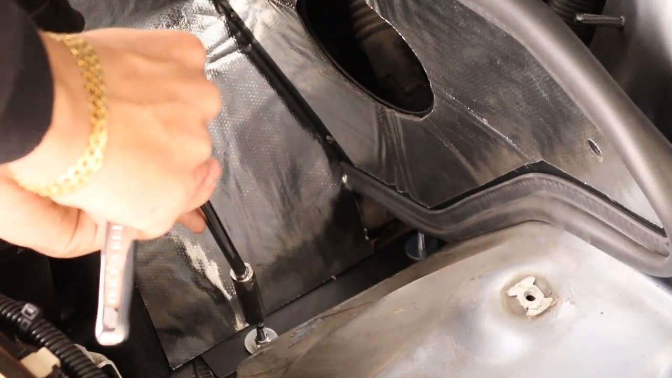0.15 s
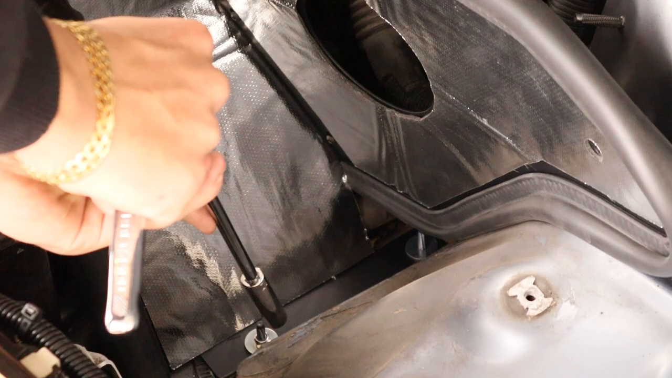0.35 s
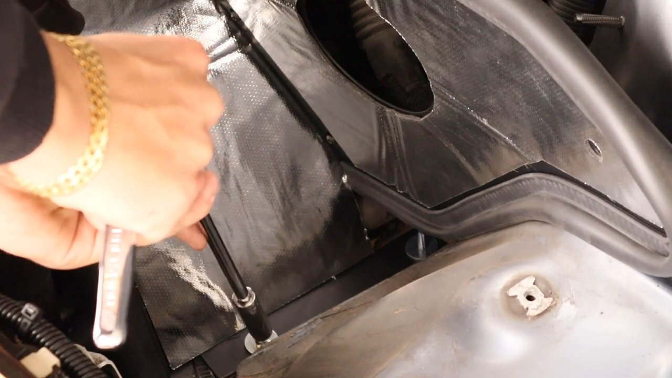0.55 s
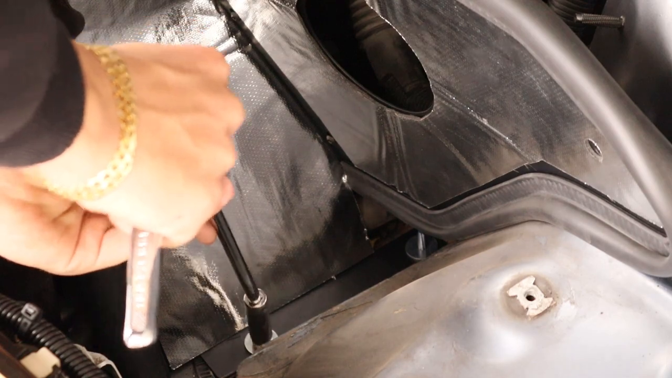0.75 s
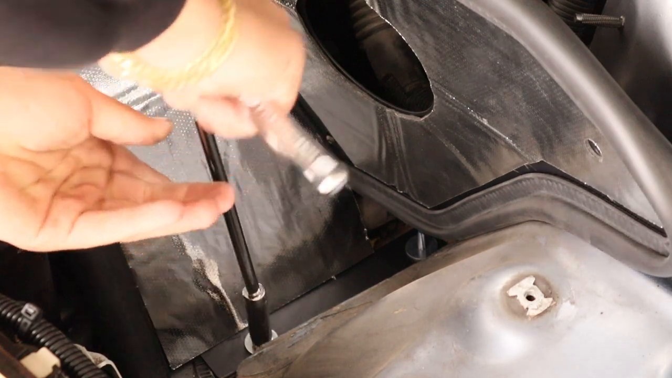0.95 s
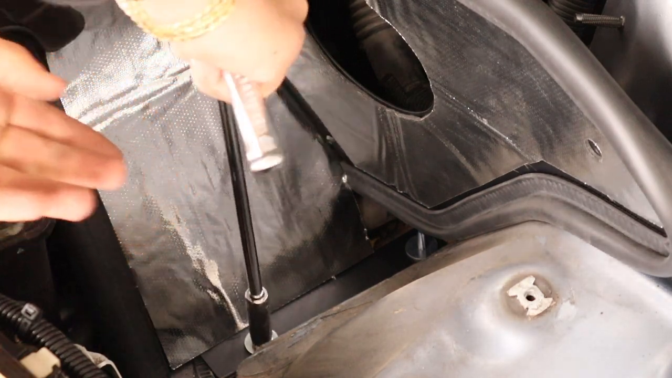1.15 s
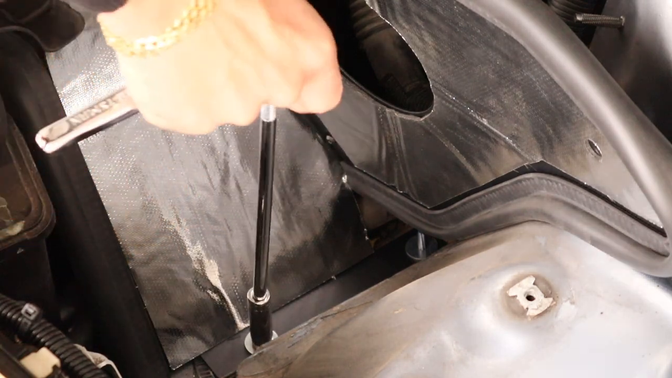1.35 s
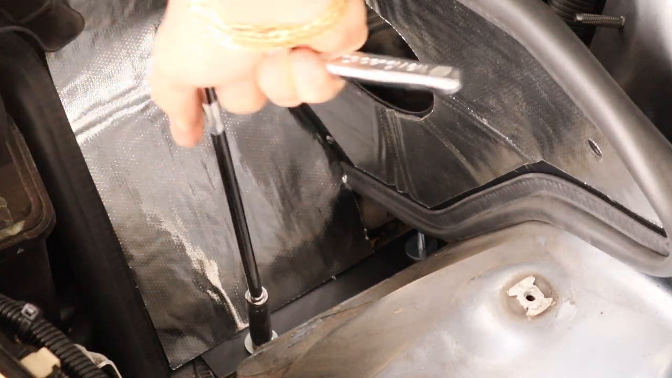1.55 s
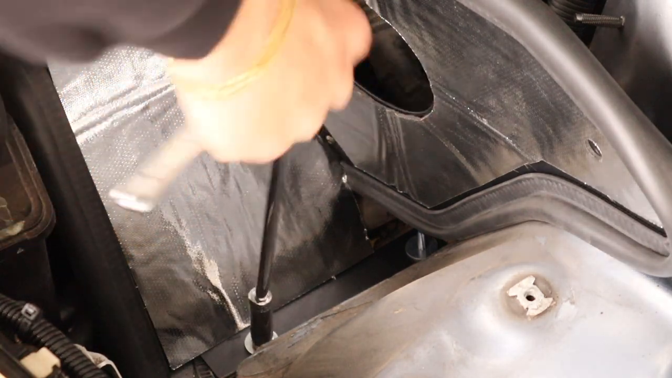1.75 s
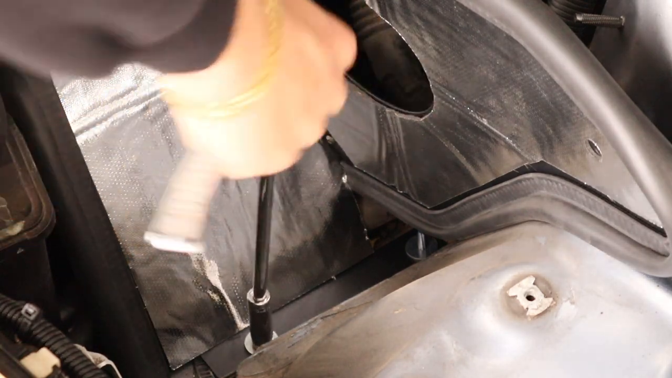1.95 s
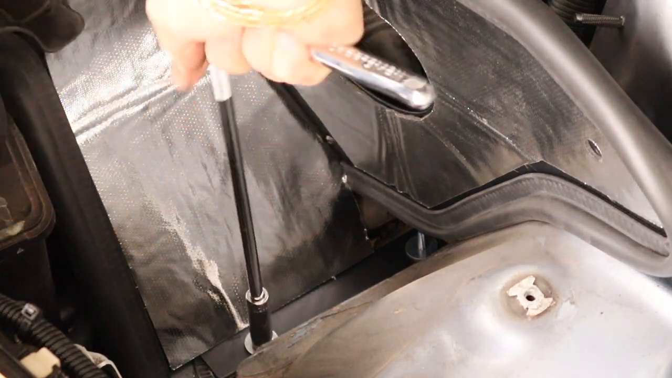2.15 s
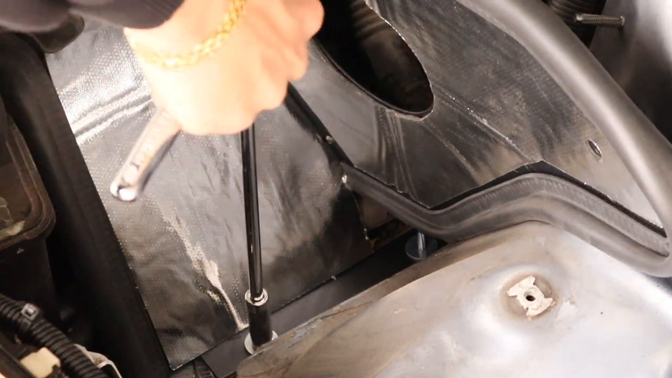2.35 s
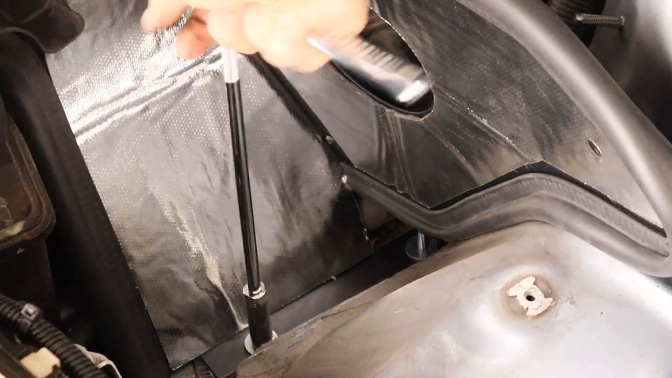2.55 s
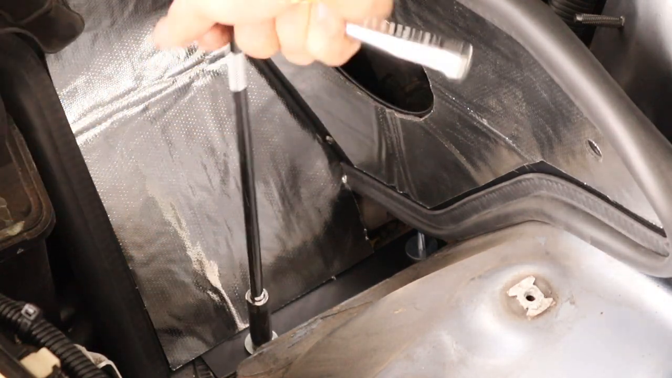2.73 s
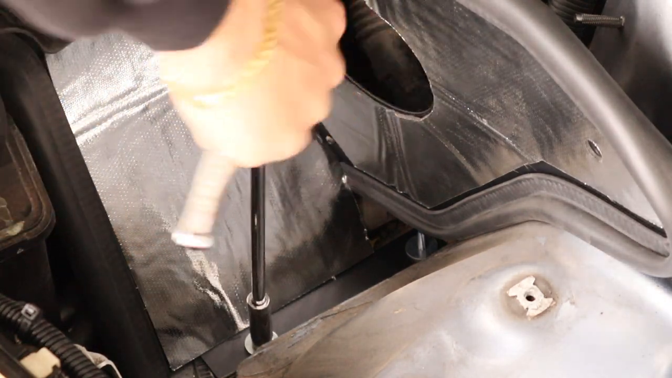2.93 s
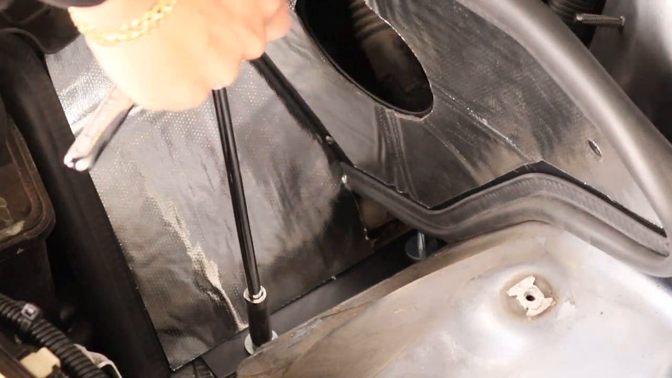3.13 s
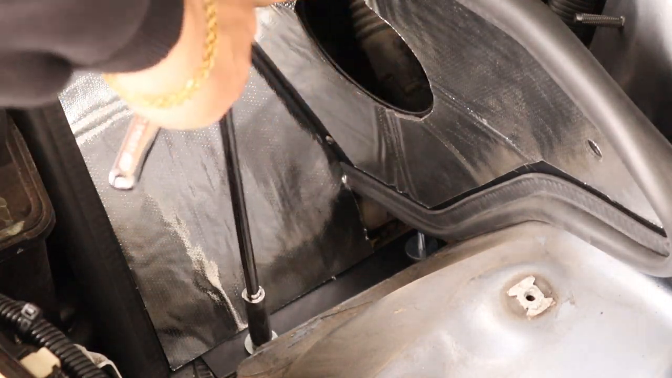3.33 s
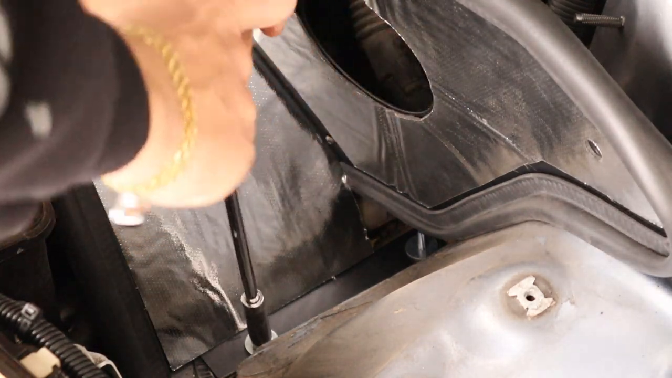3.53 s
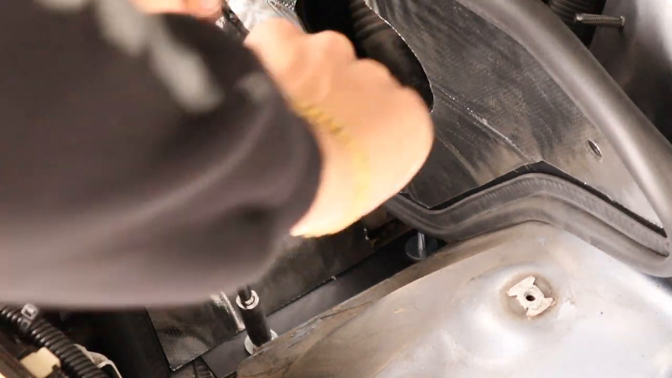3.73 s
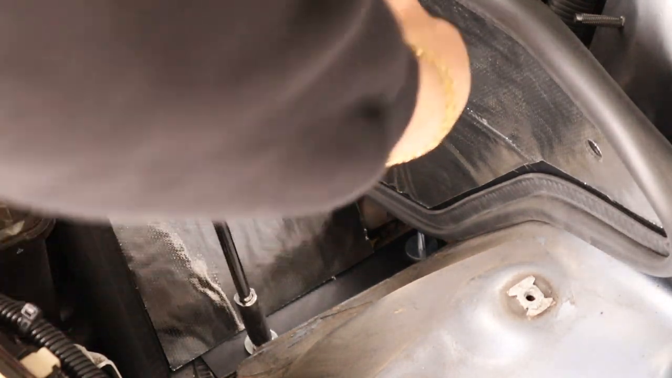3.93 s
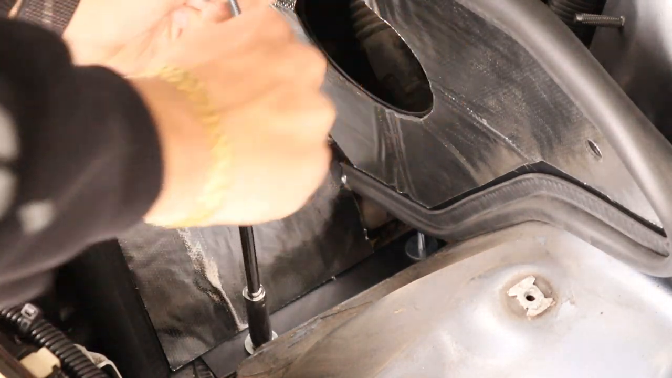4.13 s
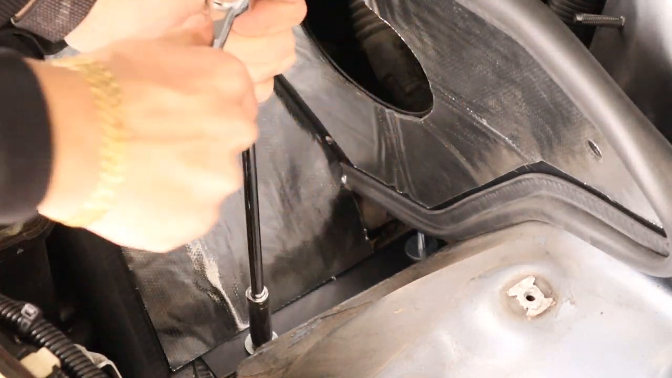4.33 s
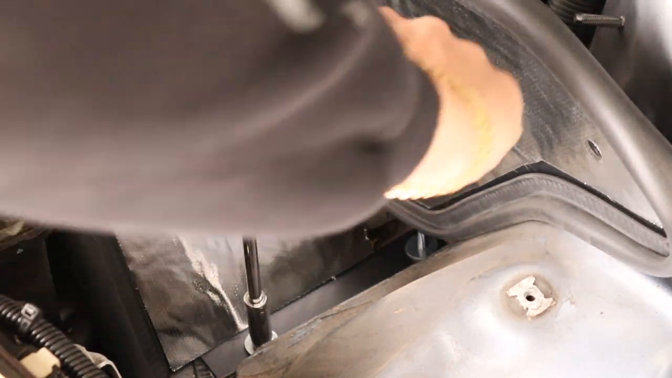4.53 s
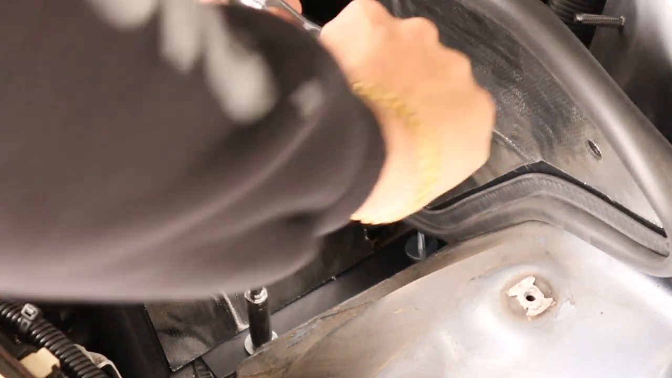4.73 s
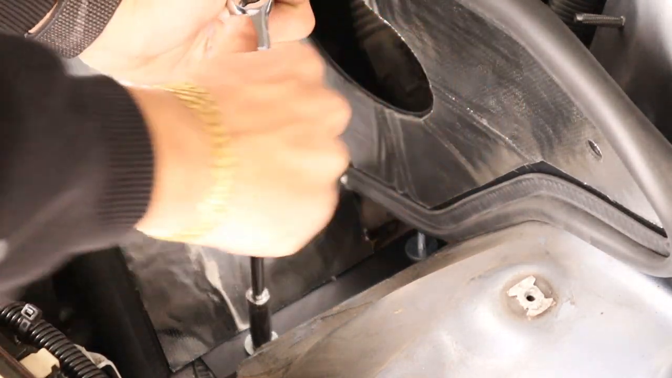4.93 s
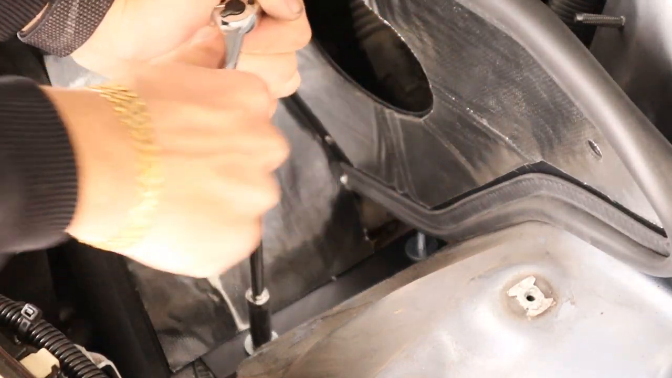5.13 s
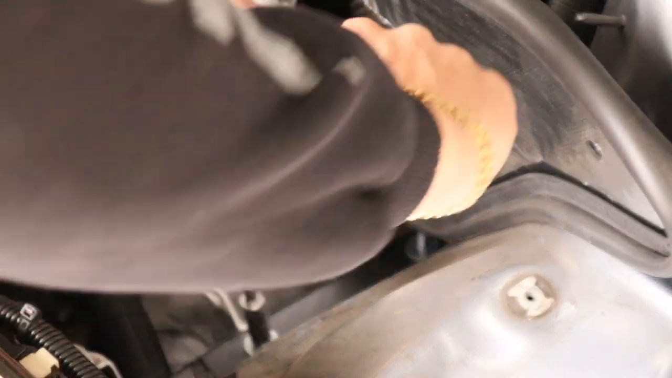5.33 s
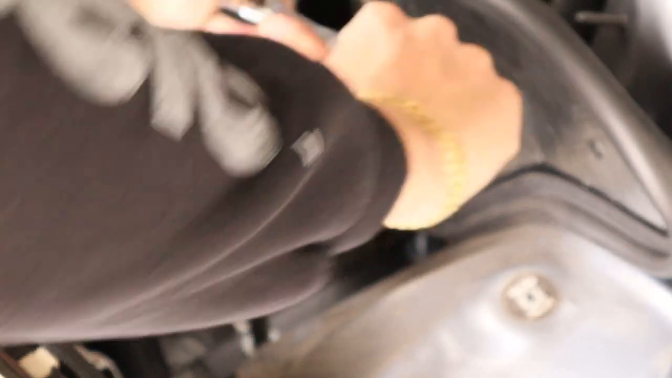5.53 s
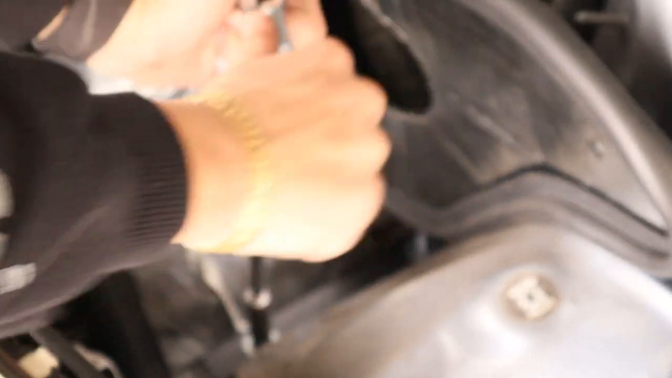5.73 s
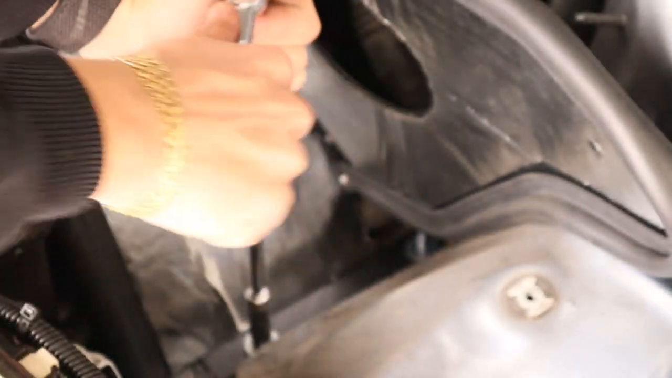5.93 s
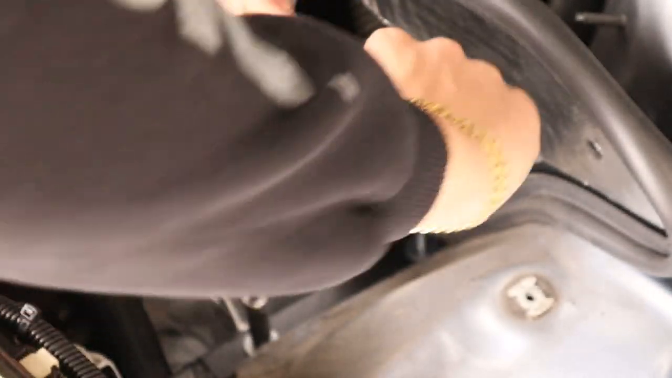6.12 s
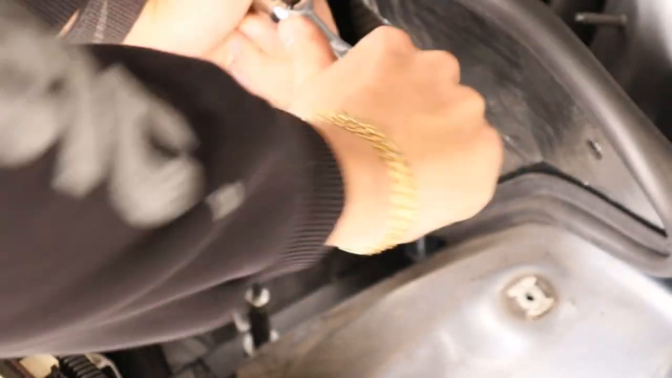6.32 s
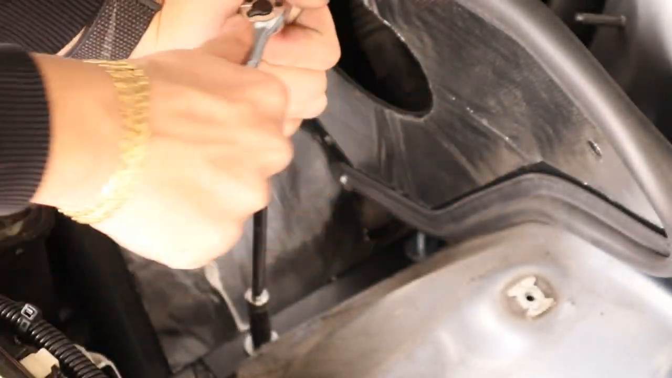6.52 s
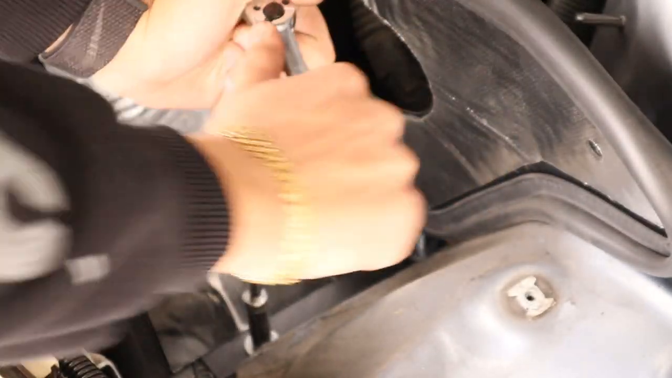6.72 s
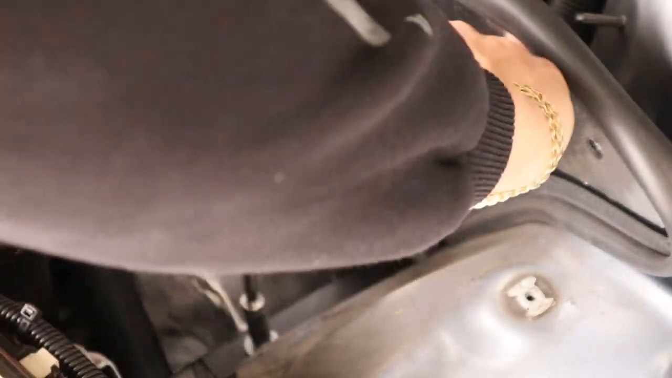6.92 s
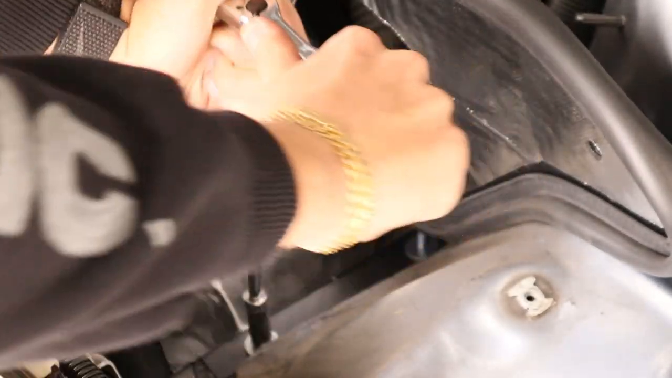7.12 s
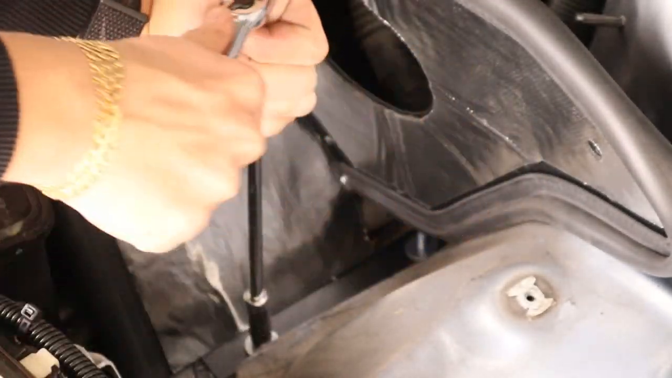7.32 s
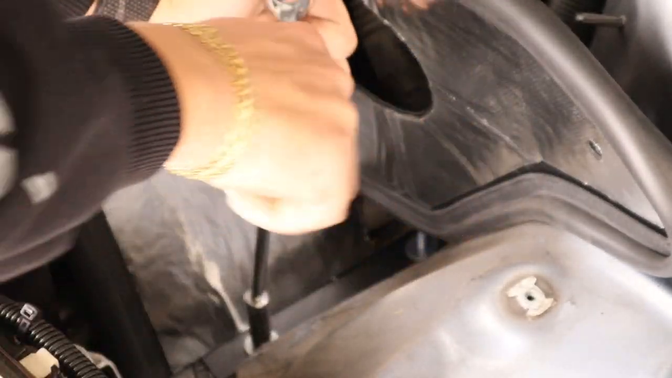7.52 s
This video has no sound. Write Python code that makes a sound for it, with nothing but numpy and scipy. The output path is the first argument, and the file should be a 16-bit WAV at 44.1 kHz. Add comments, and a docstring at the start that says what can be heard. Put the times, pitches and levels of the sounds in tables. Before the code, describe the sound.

A loose socket and long extension bar rattle and knock sharply against metal as they are seated on a nut. Then a hand ratchet works back and forth: fast bursts of bright, dry pawl clicks alternate with small clunks and dull low thumps from the car body. Close microphone in an engine bay, with short hard reflections, a light garage tail and a quiet hum underneath.

```python
"""A car engine bay inside a garage, where a hand ratchet on a long extension bar runs a nut down.
On each back swing the pawl clicks over the gear teeth; the loose socket and joints knock as the swing turns.
Each contact is a short burst of noise that rings the tool and body parts; the car body adds dull low thumps.
The nut rubs faintly on its thread, as noise through the same resonances. The bay and the garage ring on
as decaying noise echoes, over a quiet hum and a low rumble of filtered noise."""
import sys
import numpy as np
from scipy import signal
from scipy.fft import rfft
from scipy.io import wavfile

SR = 44100
rng = np.random.default_rng(int(sys.argv[2]) if len(sys.argv) > 2 else 0)


def inscribe(sig):
    """Save sig as 16-bit PCM at rate SR to the path in sys.argv[1].

    A 1-D sig is mono; a 2-D sig holds one channel per row.
    Samples are clipped to [-1, 1] before scaling.
    """
    pcm = np.round(np.clip(np.atleast_2d(sig).T, -1, 1) * 32767)
    wavfile.write(sys.argv[1], SR, pcm.astype(np.int16))


N = 338247


def from_db(db):
    """Gain of a level in dB."""
    return 10 ** (np.asarray(db, float) / 20)


def rms_one(x):
    """Scale to rms 1."""
    return x / np.sqrt(np.mean(x ** 2) + 1e-20)


def at_hz(points, hz):
    """Read a (frequency [Hz], value) table on a log-frequency axis."""
    table_hz, values = np.array(points).T
    return np.interp(np.log(hz), np.log(table_hz), values)


def bandpass(x, order, edges_hz):
    """Keep the sound between two edges."""
    return signal.sosfilt(signal.butter(order, edges_hz, "band", fs=SR, output="sos"), x)


def bands(size):
    """Half-octave bands of noise with their centres; neighbours come from separate noises."""
    edges = 20 * 2 ** np.arange(0, 10.1, .5)
    white = rng.standard_normal((2, size))
    for k, (low, high) in enumerate(zip(edges, edges[1:])):
        yield np.sqrt(low * high), bandpass(white[k % 2], 2, [low, high])


def resonance(x, hz, width_hz):
    """Two-pole resonance, gain 1 on top; a narrower one rings longer."""
    r = np.exp(-np.pi * np.clip(width_hz, 5, 5000) / SR)
    numerator = np.array([1, 0, -1]) * (1 - r * r) / 2
    denominator = [1, -2 * r * np.cos(2 * np.pi * hz / SR), r * r]
    return signal.lfilter(numerator, denominator, x + 1e-18)


# spectrum of the garage background: (frequency [Hz], relative band level [dB])
HUM = [(20, -47.5), (44, -11.5), (116, -14), (319, 2.5), (574, -3.5), (802, -1), (1060, -9), (1220, -8.5),
       (2020, -15), (2990, -17), (8410, -22), (13500, -27), (16000, -27)]
HUM_DB, HUM_FLICKER_DB = -68.5, 1.5   # overall rms; spread of each band's flicker
FLICKER_STEP = 2000   # samples


def hum():
    """Garage background and microphone hiss: noise bands, each flickering a little."""
    steps = np.arange(N // FLICKER_STEP + 2)
    out = 0
    for hz, band in bands(N):
        flicker = np.interp(np.arange(N) / FLICKER_STEP, steps, rng.standard_normal(len(steps)))
        out = out + band * from_db(at_hz(HUM, hz) + HUM_FLICKER_DB * flicker)
    return from_db(HUM_DB) * rms_one(out)


def echo(x, decay):
    """Convolve with noise that dies band by band; energy 1."""
    t = np.arange(SR // 2) / SR
    tail = 0
    for hz, band in bands(len(t)):
        t60_s = np.maximum(at_hz(decay, hz), .01)
        tail = tail + band * from_db(-60 * t / t60_s)
    tail *= np.minimum(t / 0.0019, 1)      # reflections need a moment to build up
    return signal.fftconvolve(x, tail / np.sqrt(np.sum(tail ** 2)))[:N]


# decay of the engine bay: (frequency [Hz], time to fall 60 dB [s])
BAY = [(200, 0.092), (1000, 0.1), (4000, 0.11), (8000, 0.046), (13000, 0.013)]
# decay of the garage: (frequency [Hz], time to fall 60 dB [s])
GARAGE = [(200, 0.82), (1000, 0.58), (4000, 0.58), (8000, 0.29), (13000, 0.32)]
BAY_DB, GARAGE_DB = -2.5, -7   # echo gains


def surroundings(spread):
    """The close bay and the wider garage each answer the sound that spreads from the tool."""
    return from_db(BAY_DB) * echo(spread, BAY) + from_db(GARAGE_DB) * echo(spread, GARAGE)


# low rumble that swells and fades: (time [s], deep band level [dB], middle band level [dB])
RUMBLE = [(0, -90.5, -73.5), (1.2, -83.5, -77), (2.3, -85, -75), (2.56, -95, -75), (2.69, -71, -66),
          (2.8, -81, -65.5), (3.1, -83, -78.5), (3.9, -82, -75.5), (4.4, -76, -78), (5.1, -79, -78),
          (5.5, -82, -73.5), (6.4, -78, -82), (7.67, -83, -78)]
# deep, middle and upper rumble bands: (low edge [Hz], high edge [Hz])
RUMBLE_HZ = [(30, 64), (85, 130), (140, 268)]
# the upper band: level at rest, gain against the thumps, how long it follows them
UPPER_REST_DB, UPPER_SHAKE_DB, SHAKE_S = -76.5, -5.5, 0.037


def rumble(thuds):
    """Three low noise bands: two under slow level curves, the upper one stirred by the thumps."""
    s, *levels_db = np.transpose(RUMBLE)
    gains = [from_db(np.interp(np.arange(N) / SR, s, db)) for db in levels_db]
    keep = np.exp(-1 / (SHAKE_S * SR))
    shake = np.sqrt(signal.lfilter([1 - keep], [1, -keep], thuds ** 2 + 1e-18))   # running rms
    gains.append(from_db(UPPER_REST_DB) + from_db(UPPER_SHAKE_DB) * shake)
    out = np.zeros(N)
    for edges_hz, gain in zip(RUMBLE_HZ, gains):
        out += gain * rms_one(bandpass(rng.standard_normal(N), 3, edges_hz))
    return out


# nut turning on its thread: (start [s], length [s], level at the middle [dB])
RUB = [(5.08, 0.14, -63.5), (6.317, 0.099, -58), (7.343, 0.25, -63.5), (5.75, 0.19, -76),
       (4.1, 0.58, -70.5)]
# share of the rub heard through tick, head, bar, bracket and panel: one relative level each [dB]
RUB_SHARES_DB = (-34, -35, 3, 11, 13.5)


def rub():
    """Friction noise of the nut, heard through the resonances of all the parts, twice as wide."""
    t, friction = np.arange(N) / SR, rng.standard_normal(N)
    colour = np.zeros(N)
    for share_db, part in zip(RUB_SHARES_DB, PARTS):
        for hz, width, db in part:
            colour += from_db(share_db + db) * resonance(friction, hz, 2 * width)
    level = np.zeros(N)
    for s, length, db in RUB:
        level += from_db(db) * np.sin(np.pi * np.clip((t - s) / length, 0, 1))
    return level * rms_one(colour)


# dull thumps as the strain goes into the car body: (time [s], level before shaping [dB], main tone [Hz])
THUMPS = [(0.196, -54, 370), (0.519, -58.5, 370), (0.77, -53, 241), (0.935, -45, 260), (1.07, -49, 230),
          (1.196, -43.5, 387), (1.484, -46, 430), (1.732, -41.5, 304), (1.847, -42.5, 376),
          (2.036, -60, 258), (2.127, -49, 367), (2.248, -45.5, 261), (2.589, -41, 340), (2.693, -43.5, 214),
          (2.795, -42, 355.5), (3.539, -55, 310), (3.643, -53, 281), (4.017, -38, 352), (4.447, -38.5, 244),
          (4.478, -42, 221.3), (4.785, -46, 393), (5.606, -46.5, 310), (6.038, -55, 216),
          (6.107, -41.5, 334), (6.351, -50, 246), (6.765, -41.5, 380), (7.102, -50.5, 368)]
THUMP_CYCLES, THUMP_RISE_MS = 3.16, 3.9   # cycles of the main tone to fall to 1/e; rise time


def thumps():
    """A soft push sets two low tones of the car body swinging for a few cycles."""
    out, t = np.zeros(N), np.arange(SR // 5) / SR
    for (s, db, hz), (detune, phase) in zip(THUMPS, rng.random((len(THUMPS), 2))):
        second_hz = hz * (0.602 + .9 * detune)
        swing = np.sin(2 * np.pi * hz * t) + 0.67 * np.sin(2 * np.pi * (second_hz * t + phase))
        rise = 1 - np.exp(-t * 1000 / THUMP_RISE_MS)
        fall = np.exp(-t * hz / THUMP_CYCLES)
        i = round(s * SR)
        out[i:i + len(t)] += (from_db(db) * swing * rise * fall)[:N - i]
    return out


# socket, bar and drive square knocking in their play:
# (time [s], head level [dB], bar level [dB], body level before sharing out [dB], rattle decay before limits [ms])
KNOCKS = [(0.1078, -78, -55.5, -55, 0.97), (0.1969, -42.5, -47, -29.5, 1.8), (0.2163, -56, -60, -71, 2.5),
          (0.2882, -59, -57.5, -72, 1.9), (0.4857, -75, -43.5, -38.5, 0.63), (0.4949, -53, -59, -76, 1.6),
          (0.5207, -48, -24.5, -35.5, 3.2), (0.562, -43.5, -40.5, -48.5, 3.4),
          (0.6107, -38.5, -32.5, -45, 3), (0.6351, -49, -38, -46.5, 2.5), (0.6518, -51, -47, -50, 1.1),
          (0.6784, -68, -48, -49, 1.1), (0.764, -65, -47, -50, 3), (0.773, -26, -21.5, -32.5, 1.64),
          (0.8028, -11, -25.5, -54, 0.56), (0.8102, -28, -16.5, -30.5, 3.4),
          (0.9248, -30.5, -22.5, -46.5, 0.57), (0.9366, -21, -23, -26, 4.1), (0.9537, -55, -40, -67, 1.4),
          (1.159, -68, -48, -46, 2.7), (1.1743, -53, -49, -47, 1.6), (1.1833, -38.5, -32, -33.5, 13.6),
          (1.477, -75, -77, -55, 2.8), (1.4927, -62, -43, -42.5, 1.4), (1.5002, -58, -48, -45, 2.5),
          (1.5106, -58, -41, -52, 2.5), (1.5163, -48, -32.5, -44.5, 2.3), (1.7073, -61, -41.5, -44, 2.2),
          (1.7266, -38.5, -34, -41.5, 3.5), (1.733, -45, -45, -34, 0.9), (1.8428, -59, -82, -42.5, 2.8),
          (1.912, -78, -85, -62, 3), (1.9802, -71, -49, -38.5, 1.4), (2.0141, -77, -43, -64, 1.6),
          (2.0269, -42, -39, -36, 3.8), (2.213, -66, -47, -42.5, 5), (2.2365, -36, -38.5, -38, 4.2),
          (2.496, -72, -65, -61, 2.2), (2.5631, -65, -46, -45, 1.5), (2.5724, -46, -37, -36.5, 2.4),
          (2.5804, -47, -37.5, -34, 3.3), (2.7873, -62, -36, -25, 1.8), (2.7934, -59, -36, -33, 3.8),
          (2.8269, -29.5, -31, -32.5, 3.5), (2.8412, -44, -41, -41, 2.2), (3.1408, -58, -54.5, -50, 2.1),
          (3.253, -71, -68.5, -58, 2.1), (3.296, -66, -57, -46, 0.88), (3.428, -57, -58, -57.5, 2),
          (3.4757, -44, -44, -52, 0.9), (3.488, -57, -55, -46.5, 3.5), (3.533, -60, -39, -42, 1.8),
          (3.5662, -59, -37, -52, 1.3), (3.5755, -42.5, -43.5, -49, 2.3), (3.636, -67, -50, -42.5, 4.2),
          (3.6485, -60, -41, -43, 3), (4.0117, -54, -39, -44.5, 1.4), (4.0183, -47.5, -37, -39, 1.6),
          (4.0464, -43, -47, -45, 1.1), (4.247, -62.5, -54.5, -76, 0.64), (4.354, -66, -59.5, -68, 2.3),
          (4.4491, -11.5, -19, -13.5, 1.5), (4.467, -39, -34, -37.5, 1.1), (4.4768, -41, -48, -39.5, 2.9),
          (4.7871, -55, -47, -49, 1.5), (4.7954, -57, -45, -62, 1.7), (4.7996, -54, -48, -47, 8.4),
          (4.823, -50, -41, -43.5, 1.8), (4.84, -52, -49, -45.5, 0.99), (5.2386, -73, -61, -46, 1.2),
          (5.2669, -71, -58, -51, 3.1), (5.2851, -46.5, -49, -49, 5.7), (5.569, -63, -65, -51, 1.9),
          (5.587, -59, -53, -49.5, 6.6), (5.605, -34.5, -40, -40.5, 4.2), (5.911, -74.5, -77, -57.5, 1.8),
          (6.036, -69, -55, -54.5, 2), (6.0428, -68, -48, -53, 2.5), (6.0749, -56, -36.5, -45.5, 2.2),
          (6.0833, -51, -41, -45, 2.9), (6.332, -63, -70, -51, 3.3), (6.3715, -66, -46, -45, 3),
          (6.381, -39.5, -43, -44.5, 5.9), (6.3875, -35, -41, -41.5, 2.1), (6.7184, -59, -60, -51, 1.6),
          (6.752, -50, -44.5, -41.5, 3), (6.766, -47, -46, -43, 1.5), (6.802, -50, -42.5, -45.5, 5),
          (7.0633, -50, -42, -47, 2.3), (7.0948, -40, -45.5, -39.5, 6.9), (7.284, -66, -80, -60, 2.5),
          (7.433, -67.5, -74, -54.5, 4.6), (7.584, -70, -74, -55.5, 2), (7.62, -71, -77, -55, 2.4),
          (7.6516, -57, -53, -46.5, 3.6)]
KNOCK_TICK_DB = -19   # tick level against the head, for a loud knock
LOUD_KNOCK_DB, DULLING = -32, 0.41   # the tick loses this many dB more per dB that the head lies below loud
# until the socket seats on the nut a knock reaches the bracket more than the panel, afterwards the panel more
SEATED_S, LOOSE_PANEL_DB, SEATED_BRACKET_DB = 0.87, -8.5, -4


def knocks():
    """Loose joints knock: rows of time, level in each part and rattle; soft knocks are duller."""
    rows = []
    for s, head, bar, body, rattle_ms in KNOCKS:
        tick = head + KNOCK_TICK_DB + DULLING * (head - LOUD_KNOCK_DB)
        bracket = body + SEATED_BRACKET_DB * (s > SEATED_S)
        panel = body + LOOSE_PANEL_DB * (s <= SEATED_S)
        rows.append((s, tick, head, bar, bracket, panel, rattle_ms))
    return rows


# back swings of the handle, one curve each: (time [s], teeth passed so far [count])
TURNING = [
    [(1.015, 0), (1.0636, 2), (1.0838, 3)],
    [(1.5276, 0), (1.537, 2), (1.5568, 5), (1.5685, 7), (1.5839, 10), (1.5936, 11), (1.6127, 14),
     (1.6319, 16), (1.6458, 17)],
    [(2.0458, 0), (2.056, 1), (2.06, 2), (2.0702, 3), (2.0984, 7), (2.1105, 9), (2.1268, 12), (2.1379, 13),
     (2.1527, 14), (2.1761, 15)],
    [(2.5954, 0), (2.6113, 3), (2.6354, 6), (2.6457, 7), (2.6506, 8), (2.6669, 10), (2.6891, 13),
     (2.7288, 14)],
    [(3.68, 0), (3.6992, 1), (3.762, 5), (3.7753, 6), (3.811, 9), (3.8254, 10), (3.8657, 13), (3.8832, 14)],
    [(4.5261, 0), (4.5769, 4), (4.6059, 6), (4.6249, 7), (4.6485, 8), (4.699, 9)],
    [(5.3025, 0), (5.3475, 4), (5.3726, 6), (5.3879, 7), (5.4061, 8), (5.4282, 9), (5.4455, 10),
     (5.466, 11), (5.5046, 12)],
    [(6.0988, 0), (6.1174, 1), (6.1307, 2), (6.1655, 5), (6.1795, 6), (6.1965, 7), (6.2198, 8), (6.2483, 9)],
    [(6.8232, 0), (6.844, 2), (6.8769, 5), (6.9024, 7), (6.9102, 8), (6.9227, 9), (6.9389, 10), (6.958, 11),
     (6.9898, 12)],
]
# strength of the pawl's clicks, one curve a swing:
# (time [s], head level [dB], bar level [dB], bracket and panel level [dB])
CLICKS = [
    [(1.015, -36.5, -34.5, -41.5), (1.064, -37, -35, -41), (1.084, -33, -37, -44)],
    [(1.528, -30.5, -43.5, -43.5), (1.54, -33, -31.5, -47), (1.557, -32, -35, -43), (1.57, -34, -42, -44),
     (1.585, -33, -35, -50), (1.613, -33.5, -37, -48), (1.646, -34.5, -39.5, -51)],
    [(2.046, -29.5, -33.5, -38), (2.06, -34, -35.5, -38), (2.072, -29.5, -30, -34),
     (2.098, -34.5, -29.5, -41.5), (2.127, -32, -29.5, -51), (2.138, -28.5, -37, -41.5),
     (2.153, -34, -36, -44), (2.176, -34, -37, -49)],
    [(2.595, -29, -39, -44), (2.611, -30.5, -36, -50), (2.645, -32, -38, -46), (2.667, -30, -34, -44.5),
     (2.689, -36.5, -39, -38.5), (2.729, -31.5, -39, -58)],
    [(3.68, -34, -34, -60), (3.7, -29.5, -37, -55), (3.762, -35, -36.5, -50), (3.776, -29.5, -38, -49),
     (3.811, -32.5, -35.5, -46), (3.826, -28.5, -34.5, -42.5), (3.866, -33, -35, -45),
     (3.883, -32, -39, -44)],
    [(4.526, -29.5, -47, -59), (4.552, -34.5, -37, -31), (4.577, -31, -31.5, -49), (4.592, -32, -41, -54),
     (4.625, -37, -33, -37), (4.648, -34, -33, -66), (4.699, -38, -33, -37)],
    [(5.302, -32, -44.5, -49.5), (5.34, -31.5, -43, -56.5), (5.388, -29.5, -40, -42.5),
     (5.406, -32.5, -45, -66), (5.43, -32, -43.5, -40), (5.466, -36, -41, -48.5), (5.505, -36.5, -38, -44)],
    [(6.099, -36, -29.5, -38.5), (6.117, -32, -40, -44), (6.143, -27.5, -43, -49), (6.165, -29, -32, -45.5),
     (6.18, -36, -48, -43.5), (6.197, -31, -46, -62), (6.22, -33, -43, -45.5), (6.248, -32.5, -49, -53.5)],
    [(6.823, -32, -48, -52), (6.856, -29, -40, -47), (6.877, -25.5, -46, -48), (6.902, -26, -41, -49.5),
     (6.911, -32, -37, -46), (6.923, -29.5, -36, -46), (6.939, -31, -43.5, -47), (6.99, -33.5, -36, -49)],
]
# chance from tooth to tooth: head, bar and body spread [dB]
TOOTH_SPREAD_DB = (0.66, 1.7, 1)
PAWL_RATTLE_MS, PAWL_TICK_DB = 2.62, -9.5   # rattle decay; tick level against the head


def teeth():
    """The pawl clicks once for every tooth that a swing passes, in the same rows as the knocks."""
    rows = []
    for turning, clicks in zip(TURNING, CLICKS):
        turning_s, passed = np.transpose(turning)
        s = np.interp(np.arange(passed[-1] + 1), passed, turning_s)
        at_s, *levels_db = np.transpose(clicks)
        chance_db = (rng.standard_normal((len(s), 3)) * TOOTH_SPREAD_DB).T
        head, bar, body = chance_db + [np.interp(s, at_s, db) for db in levels_db]
        rows += zip(s, head + PAWL_TICK_DB, head, bar, body, body, np.full(len(s), PAWL_RATTLE_MS))
    return rows


# one ring stands out for a while, perhaps as the grip changes:
# (start [s], length [s], centre [Hz], lift at the centre [dB])
STANDOUTS = [(0.185, .33, 1190, 9), (0.605, .15, 1630, 12), (0.765, .14, 1220, 5), (0.915, .06, 1190, 2),
             (1.175, .2, 870, 1), (1.565, .1, 4800, 2.5), (1.715, .2, 1070, 12), (2.063, .082, 2457, 26),
             (2.59, .11, 4800, -1), (2.78, .04, 2170, 15), (2.82, .2, 6100, 13), (3.665, .25, 5040, 1.5),
             (4.435, .08, 2090, 19), (4.515, .25, 3870, 11), (4.775, .2, 5520, 21), (5.595, .1, 6040, 10),
             (6.125, .2, 1630, 8), (6.355, .1, 5500, 8), (6.81, .2, 5840, 7.5), (6.85, 0.06, 8850, 2.5),
             (7.055, .1, 833, 9)]
STANDOUT_WIDTH_OCT = 0.12
ECHO_LIFT_SHARE = 0.44   # the echoes carry only part of a ring's lift


def standout_lift(hit_s, hz):
    """Lift in dB of every mode at every hit, greatest for modes nearest the ring that stands out."""
    lift_db = 0
    for s, length, ring_hz, lift in STANDOUTS:
        during = (hit_s > s) & (hit_s < s + length)
        nearness = np.exp(-.5 * (np.log2(hz / ring_hz) / STANDOUT_WIDTH_OCT) ** 2)
        lift_db = lift_db + lift * during * nearness
    return lift_db


# resonances of the contact tick and the four ringing parts: (frequency [Hz], width [Hz], relative level [dB])
TICK = [(10730, 1500, 1), (13000, 1500, 2.5), (15400, 2100, -2)]
HEAD = [(4244, 650, -5), (4790, 514, 0), (5370, 500, -0.5), (6520, 1100, -3.5), (7640, 1100, -0.5),
        (8606, 290, 0.5), (9370, 400, -13)]
BAR = [(1622, 110, -3), (1960, 130, -7.5), (2270, 270, -6.5), (2690, 255, -5.5), (3074, 190, -7.5),
       (3556, 262, -5), (4120, 2200, -12.5)]
BRACKET = [(781, 220, 1.5), (1046, 110, -1), (1198, 73, 5), (1408, 53, -2.5)]
PANEL = [(339, 200, -11), (424, 75, -4), (518, 112, -1), (575, 46.5, 4), (695, 130, -12)]
PARTS = (TICK, HEAD, BAR, BRACKET, PANEL)
# the blow reaches the larger parts later: one lag per part [ms]
PART_LAG_MS = (0, 0.1, .4, 1.2, 1.8)
STRIKE_SPREAD_DB = 3   # chance in each mode from hit to hit, direct sound only
SOFT_EDGE = 1.74   # a part radiates little above this multiple of its highest mode
ECHO_BLUR = 1.574   # the echoes hear modes this many times wider


def strikes():
    """Contacts bounce briefly and ring all modes; returns the direct sound and what feeds the echoes."""
    hits = np.array(teeth() + knocks())
    t_ms = np.arange(900) / SR * 1000
    fall_ms = np.clip(hits[:, 6:], .3, 8)
    shape = np.minimum(t_ms / 0.29, 1) * np.exp(-t_ms / fall_ms)
    rattles = rng.standard_normal(shape.shape) * shape
    energy = np.sum(shape ** 2, axis=1)
    power = np.abs(rfft(rattles)) ** 2
    bins_hz = np.linspace(0, SR / 2, power.shape[1])
    start = np.round(hits[:, 0] * SR).astype(int)
    where = (start[:, None] + np.arange(len(t_ms))).ravel()
    out = np.zeros((2, N))
    for k, part in enumerate(PARTS):
        hz, width, db = np.transpose(part)
        lift_db = standout_lift(hits[:, :1], hz)
        # narrow modes have no time to build up fully within one rattle
        reach = np.pi * width / SR * np.minimum(np.pi * width * fall_ms / 2000, 1)

        def mode_gains(mode_db):
            """Share the part's level among its modes by energy."""
            total = np.sum(reach * from_db(2 * mode_db), axis=1, keepdims=True)
            return from_db(hits[:, 1 + k:2 + k] + mode_db) / np.sqrt(total)

        gain = mode_gains(db + lift_db)
        echo_gain = mode_gains(db + ECHO_LIFT_SHARE * lift_db)
        spot = from_db(STRIKE_SPREAD_DB * rng.standard_normal(gain.shape))
        # summed over all directions the modes even out: the echoes get one plain blow of the same energy
        blow = np.sqrt(energy) * rng.choice([-1, 1], len(hits))
        ringing = np.zeros((2, N))
        for m in range(len(part)):
            near_mode = 1 / (1 + (2 * (bins_hz - hz[m]) / width[m]) ** 2)
            fed = np.sqrt(energy * near_mode.sum() / (power @ near_mode))   # each mode gets its full share
            strength = gain[:, m] * spot[:, m] * fed
            push = np.bincount(where, (rattles * strength[:, None]).ravel(), N)[:N]
            blows = np.bincount(start, echo_gain[:, m] * blow, N)
            sign = (-1) ** m
            ringing[0] += sign * resonance(push, hz[m], width[m])
            ringing[1] += sign * resonance(blows, hz[m], ECHO_BLUR * width[m]) / np.sqrt(ECHO_BLUR)
        edge_hz = min(SOFT_EDGE * hz.max(), .45 * SR)
        ringing = np.roll(ringing, int(PART_LAG_MS[k] * SR / 1000), axis=1)
        out += signal.sosfilt(signal.butter(2, edge_hz, fs=SR, output="sos"), ringing)
    return out


DEEPEST_HZ = 130   # strikes and thumps radiate little below this


def scene():
    """The tool and car body, direct and in two echoes, over rub, hum and rumble."""
    thuds = thumps()
    high_pass = signal.butter(2, DEEPEST_HZ, "high", fs=SR, output="sos")
    direct, spread = signal.sosfilt(high_pass, strikes() + thuds)
    return (direct + surroundings(spread) + rub() + hum() + rumble(thuds))[None]


CUTOFF_HZ = 16900   # 70 dB down from here up


def record(dry):
    """The microphone's top is cut steeply by a low-pass filter."""
    return signal.sosfilt(signal.cheby2(14, 70, CUTOFF_HZ, fs=SR, output="sos"), dry)


dry = scene()
out = record(dry)
inscribe(out)
```